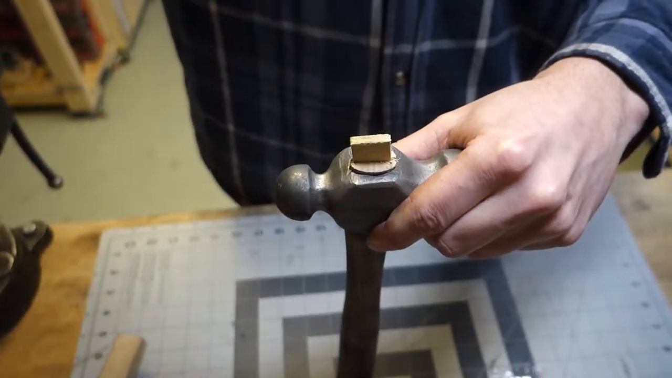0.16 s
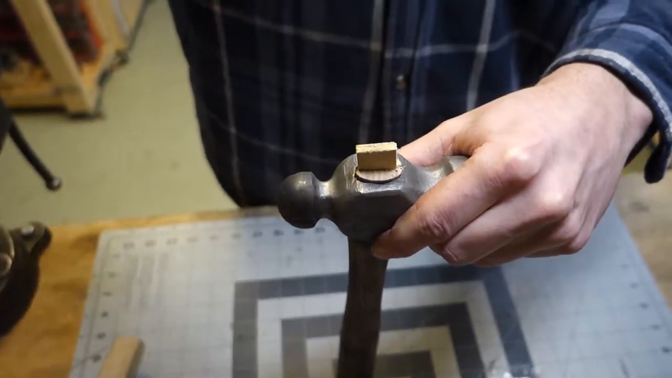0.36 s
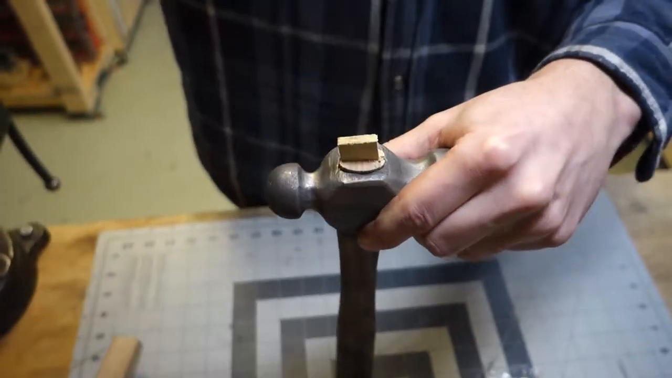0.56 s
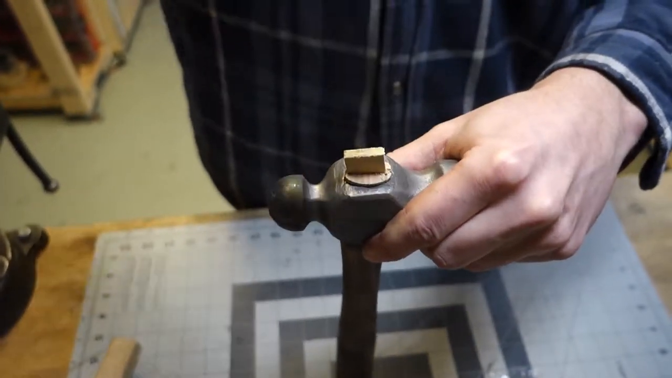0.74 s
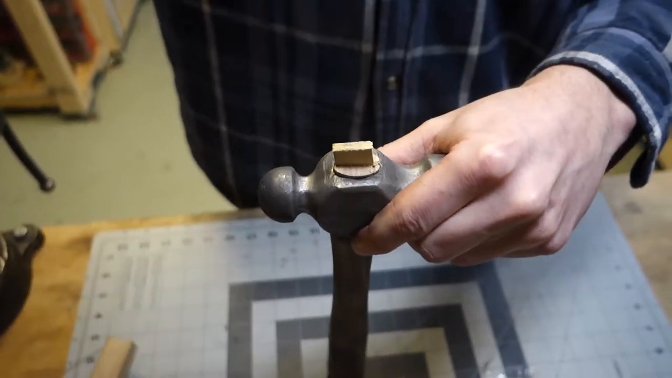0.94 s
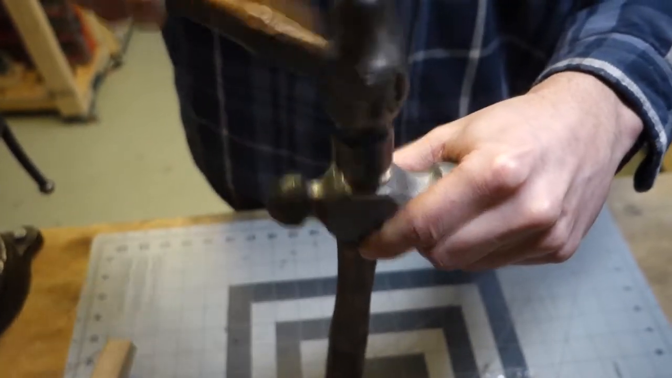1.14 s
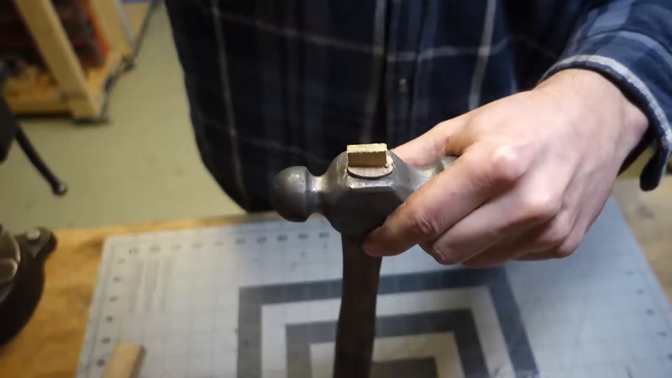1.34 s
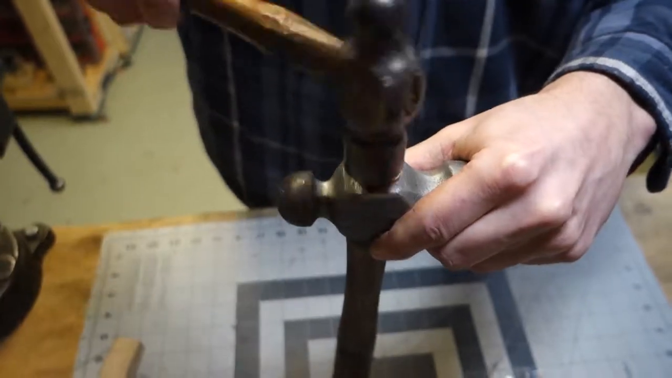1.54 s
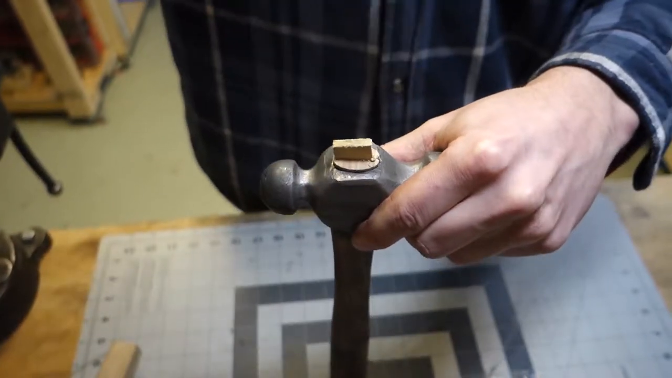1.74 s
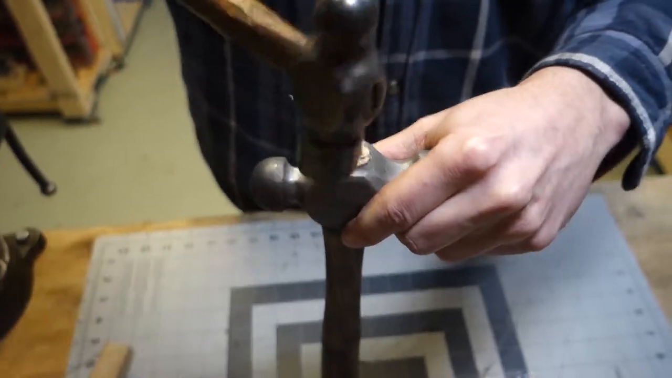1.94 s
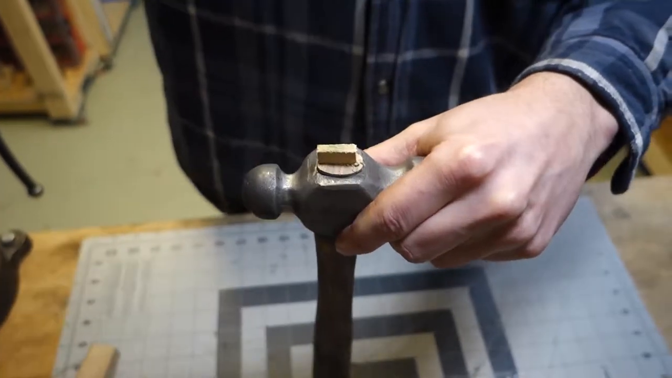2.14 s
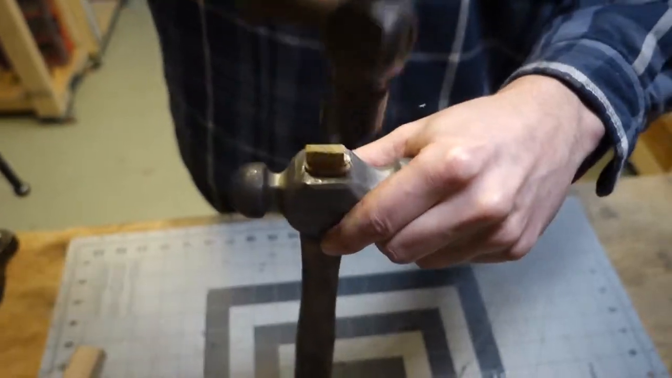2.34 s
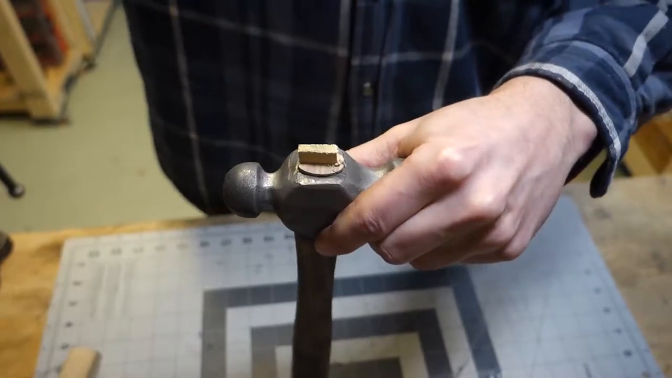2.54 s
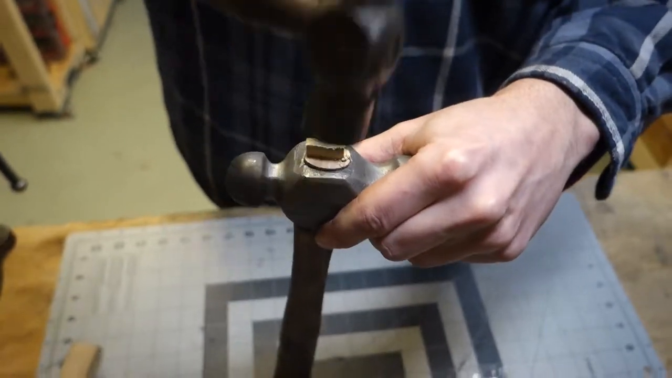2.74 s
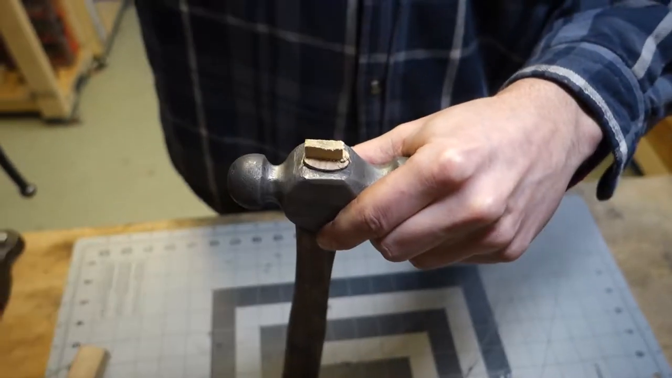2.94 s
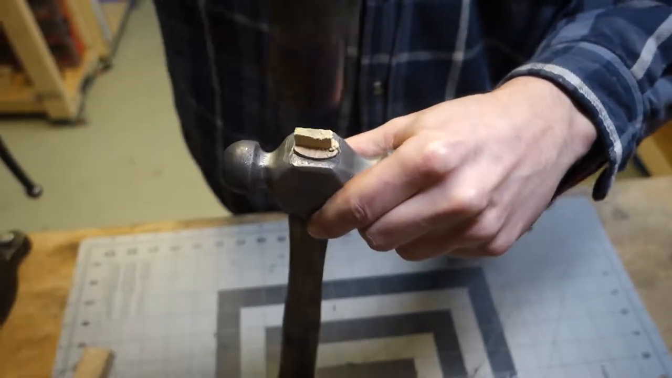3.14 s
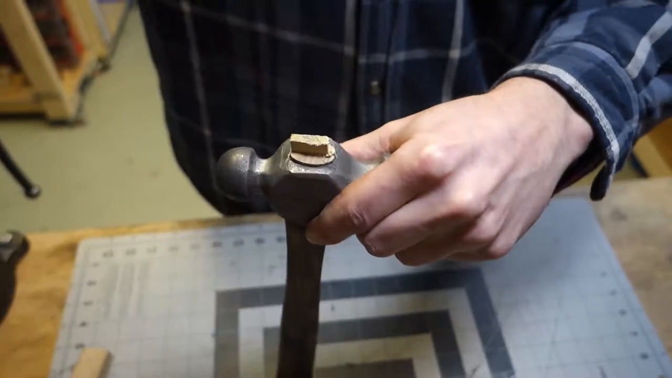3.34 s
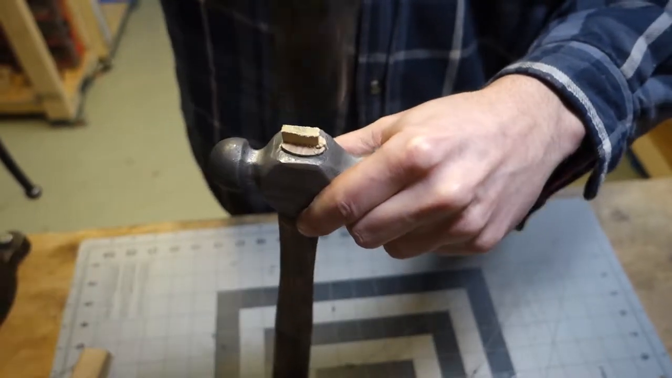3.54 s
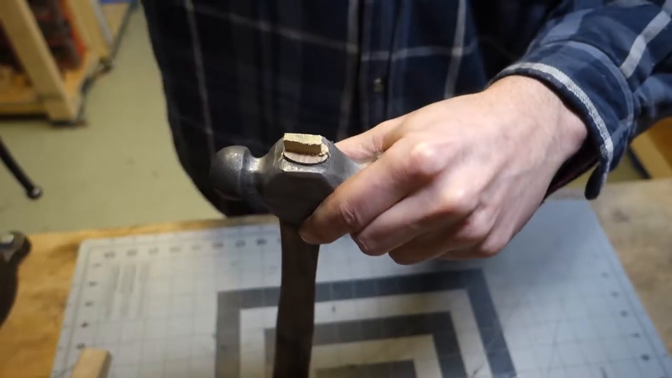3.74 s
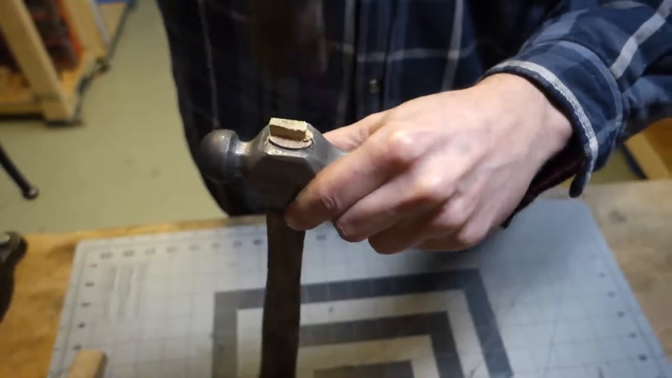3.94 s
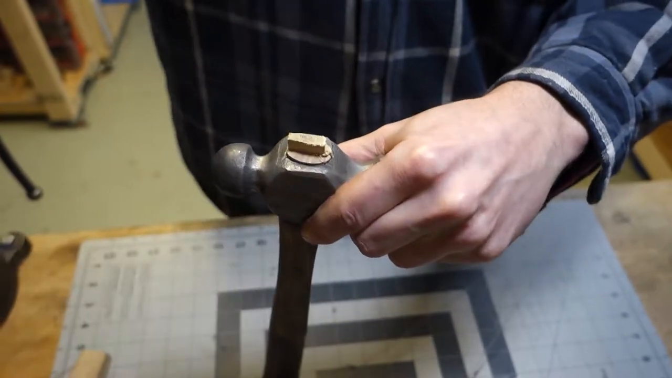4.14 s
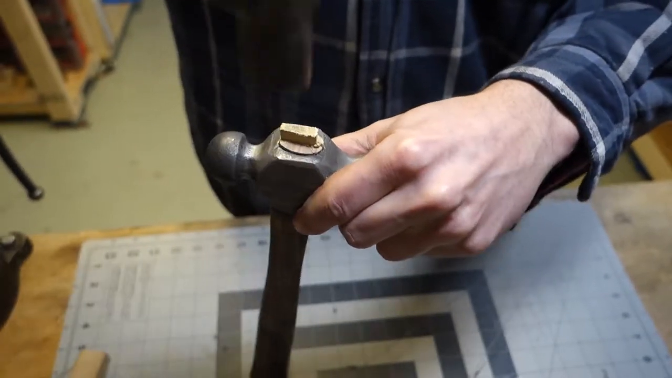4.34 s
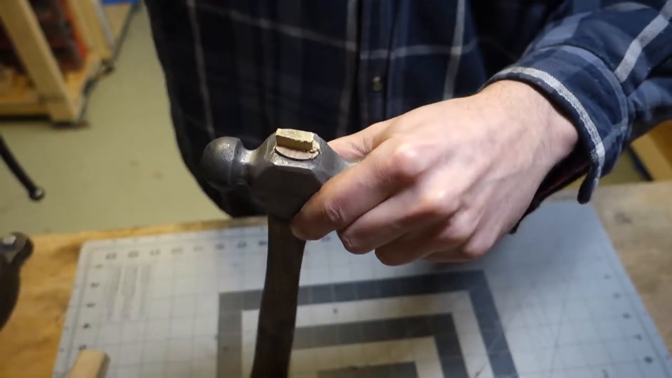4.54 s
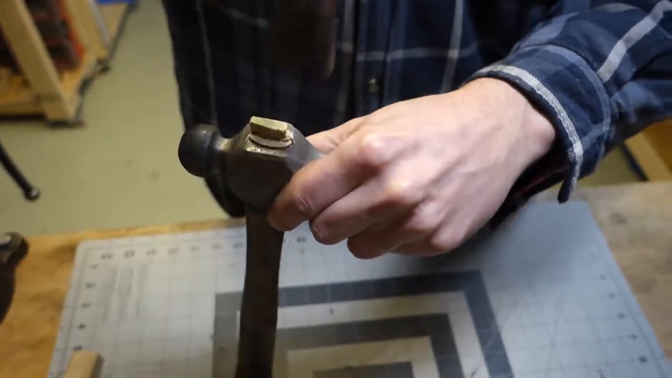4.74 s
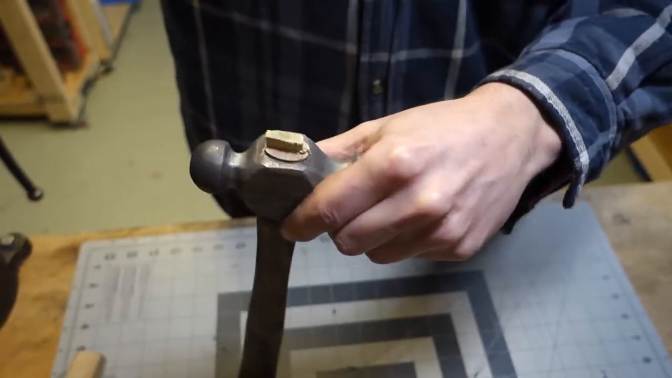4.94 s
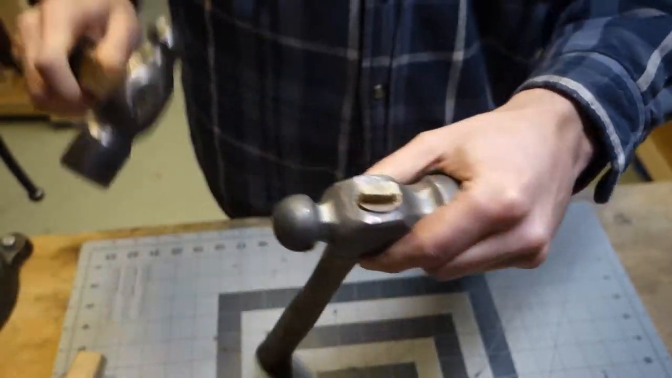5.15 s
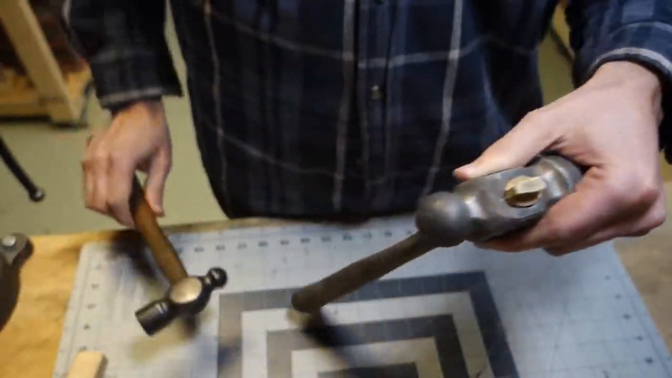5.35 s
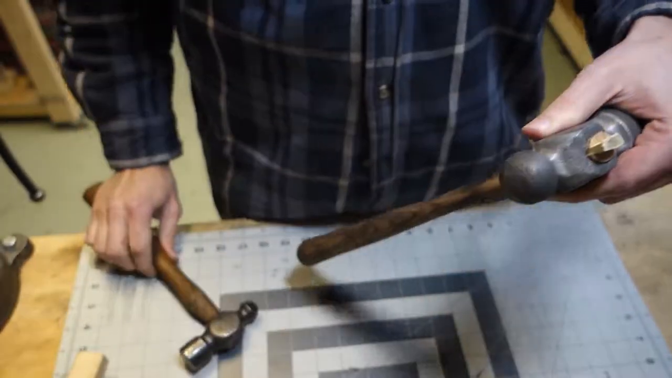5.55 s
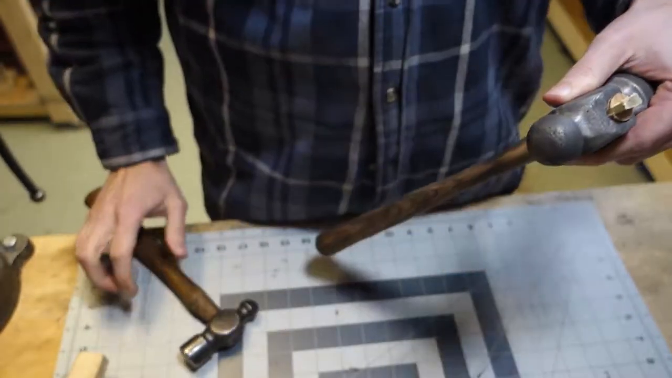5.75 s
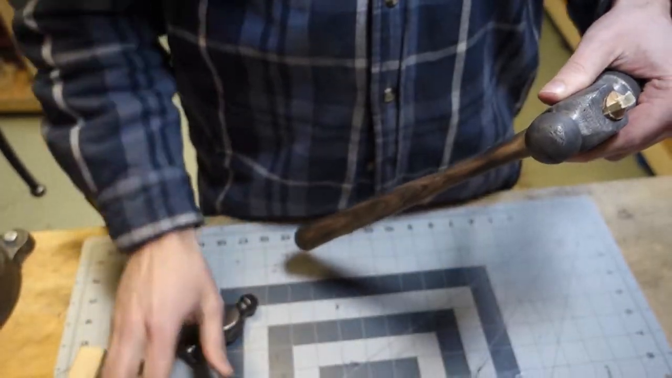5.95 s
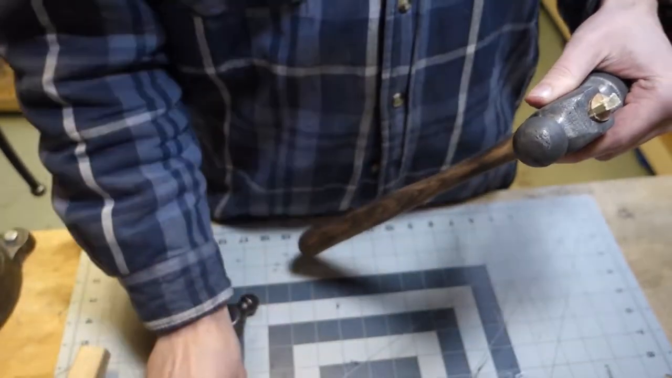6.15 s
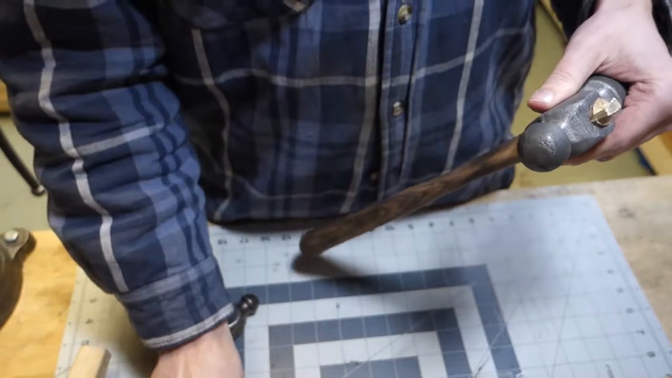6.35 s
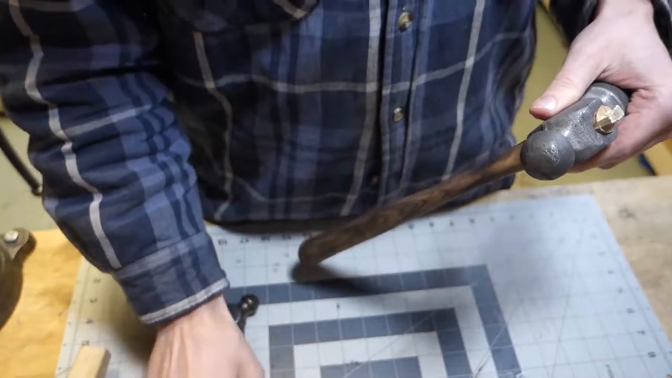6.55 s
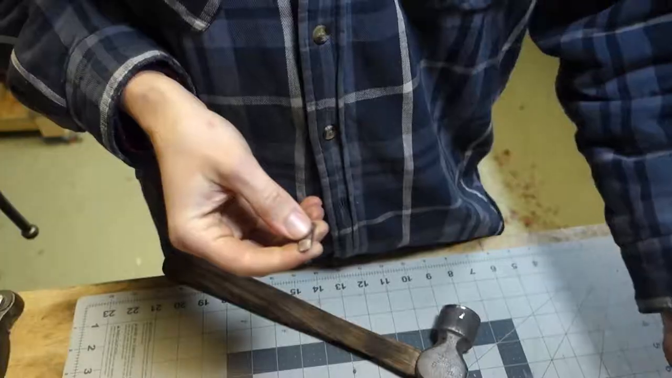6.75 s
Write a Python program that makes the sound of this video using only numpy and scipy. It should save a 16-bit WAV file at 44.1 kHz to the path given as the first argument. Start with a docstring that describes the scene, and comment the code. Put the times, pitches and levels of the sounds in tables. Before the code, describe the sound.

A hammer knocks a wooden wedge in steady loud woody thuds, a loose tool faintly rattling, before a mat thump, cloth rustle and soft hiss.

```python
"""A small hammer drives a wooden wedge into a handle standing on a workbench: twelve even blows, after the
rumble of one before the start. Each sums a crack (decaying noise), bench modes, steel modes and a room tail.
During the later blows a loose tool rattles on the bench. Then the hammer is laid on a mat (damped modes),
a sleeve drags over it (modulated noise), a bit of steel is picked up (wavering modes) and a soft hiss sinks away.
Faint noise lies beneath throughout; a limiter squashes the peaks and lets the room swell after them."""
import sys
import numpy as np
from scipy import signal
from scipy.fft import rfft, irfft
from scipy.io import wavfile
from scipy.ndimage import minimum_filter1d

SR = 44100
rng = np.random.default_rng(int(sys.argv[2]) if len(sys.argv) > 2 else 0)


def dump(signal):
    """Clip the signal to [-1, 1] and save it as 16-bit WAV at the path in sys.argv[1]."""
    limited = np.clip(np.atleast_2d(signal).T, -1, 1)
    pcm = np.round(limited * 32767).astype(np.int16)
    wavfile.write(sys.argv[1], SR, pcm)


N = 299435

# All levels in the tables are relative; the functions weight them further.
# Blows on the wedge: t/s, force level/dB, crack level/dB, steel ring level/dB
WEDGE_BLOWS = [(-.45, -5, 0, 0), (0.448, 0, -11.5, 6), (0.8304, 0.5, -8.5, -2), (1.205, -0.5, -7.5, 0.5),
               (1.5739, -1, -9.5, 3.5), (1.958, -1, -6, 1), (2.346, -1, -1, 7), (2.7424, -1.5, -4.5, 4.5),
               (3.1293, -3, -4.5, 9), (3.5341, -1.5, -0.5, 4.5), (3.9152, -0.5, 0, -7.5),
               (4.32, -0.5, -4.5, -1.5), (4.711, -2, -3, 2.5)]
# Resonances of the bench top: f/Hz, level/dB, decay time T60/s
BENCH_MODES = [(60.8, -14.5, 0.34), (94.8, -23, 0.45), (137.4, 1.5, 0.27), (148, -11.5, 0.47),
               (166.8, -0.5, 0.074), (207.8, -7.5, 0.17), (217, -3, 0.27), (247.4, -4, 0.25),
               (273.2, -3.5, 0.23), (308.8, -1.5, 0.2), (330, 0.5, 0.22), (359.7, -11.5, 0.33),
               (402, -23.5, .38), (397.4, -4, 0.23), (436.7, -23, 0.42), (488, -16.5, .34),
               (512, -21.5, 0.1), (581, -17, 0.29), (667, -22, 0.27), (766.6, -19, 0.42)]
# Resonances of the steel hammer head: f/Hz, level/dB, decay time T60/s
HEAD_MODES = [(4002, -54.5, 0.17), (4200, -43, 0.27), (6896, -37, 0.21), (7900, -47.5, 0.2),
              (8620, -50, 0.092), (9740, -41, 0.13), (9940, -44, 0.14), (11570, -49, 0.19),
              (11700, -56, .22), (12678, -45.5, .24), (13447, -47.5, 0.15), (14270, -48.5, .18),
              (15200, -41, .15)]
# Wedge biting into the handle, as noise: f/Hz, starting level/dB, decay time T60/s
CRACK_SPECTRUM = [(197.2, -11.5, 0.064), (700, -10.5, 0.18), (1700, -9, 0.12), (3170, -23, 0.059),
                  (5100, -31.5, 0.095), (8000, -29, 0.029), (11000, -40, .03), (16000, -32, .025)]
# Things shaking on the bench, as noise: f/Hz, starting level/dB, decay time T60/s
CHATTER_SPECTRUM = [(103.2, -18.5, 0.2), (674, -1.5, 0.35), (2360, -4, 0.3), (3280, -13.5, 0.34),
                    (5780, -25.5, 0.17), (15900, -38.5, 0.29)]
# Reverberation of the workshop: f/Hz, level/dB, decay time T60/s
WORKSHOP_REVERB = [(30, -14.5, 0.18), (67, 0.5, 0.52), (143.1, 26.5, 0.13), (360, 17.5, 0.31),
                   (476, 14, 0.32), (1013, 0.5, 0.34), (1625, 1.5, 0.35), (2556, -7, 0.32),
                   (3340, -17, 0.3), (5194, -25.5, 0.28), (9850, -34, 0.23), (16000, -27.5, 0.22)]
# Slower, mostly deep tail of each blow: f/Hz, level/dB, decay time T60/s
RUMBLE_REVERB = [(30, -26, 0.73), (60, -10.5, 1), (127.4, -13.5, 1.88), (218, -10, 1.25),
                 (385.7, -14, 0.87), (693, -23.5, 0.85), (1557, -51, 0.54), (5030, -65, 0.21)]
# Loose tool scraping, then landing on the bench: t/s, time in the air/s, ring level/dB
TOOL_RATTLES = [(3.6, 0.022, -45), (4.001, 0.03, -44.5), (4.393, 0.057, -43)]
# Resonances of the loose tool: f/Hz, level/dB, decay time T60/s
TOOL_MODES = [(3862, 4.5, 0.19), (3800, 3.5, 0.12)]
# Hammer and hand meeting the mat: t/s, thump level/dB, clack level/dB, time to the next touch/s
MAT_CONTACTS = [(5.584, -17, -13.5, 0.006), (5.719, -14.5, -25, 0.0069), (5.742, -6.5, -25.5, 0.013),
                (6.108, -45, -56, 0.023), (6.134, -47.5, -59, 0.023), (6.199, -42.5, -69, .016),
                (6.339, -52.5, -74, 0.012)]
# Resonances of the mat under a thump: f/Hz, level/dB, decay time T60/s
MAT_MODES = [(126, -7, 0.091), (173, 2.5, 0.044), (239.6, -0.5, 0.082), (388, 2.5, 0.039),
             (473, -9.5, 0.065), (676, -10, 0.034)]
# Woody clack on the mat, as noise: f/Hz, level/dB, decay time T60/s
CLACK_SPECTRUM = [(80, -18, .05), (400, -11, 0.029), (1380, -2.5, 0.033), (2580, -10, 0.015),
                  (3860, -23, 0.027), (9000, -33, 0.014), (15800, -47, 0.033)]
# Room answering the contacts with the mat: f/Hz, level/dB, decay time T60/s
CONTACT_REVERB = [(40.4, -13, 0.17), (130, -4.5, 0.88), (300, 6.5, 0.4), (677, 9, 0.24), (1440, -4, 0.21),
                  (2550, -18.5, 0.32), (4400, -38, 0.28), (15500, -53, 0.12)]
# Fingers picking up the bit of steel: t/s, ring level/dB, extra level of the high modes/dB, tick level/dB
STEEL_TOUCHES = [(6.396, -50, -20, -51), (6.439, -51.5, 3, -51), (6.514, -73.5, -0.5, -51),
                 (6.654, -80.5, 5.5, -48.5)]
# Resonances of the bit of steel: f/Hz, level/dB, decay time T60/s
BIT_MODES = [(2480, -11, 0.069), (2630, 1, 0.081), (3720, -9, 0.059), (3834, -7.5, 0.18),
             (4000, -14, 0.083), (6610, -8, 0.091), (8786, -10, 0.052)]
# Sleeve strokes over the mat: t/s, hold time/s, level/dB
SLEEVE_STROKES = [(5.85, 0.5, -17.5), (6.133, 0.041, 8.5), (6.358, 0.11, 0.5)]
# Spectrum of cloth on the mat: f/Hz, level/dB
CLOTH_SPECTRUM = [(30, -80), (200, -49), (600, -76.5), (1200, -63.5), (1600, -68), (2400, -58.5),
                  (3400, -73), (6000, -85), (15000, -93)]
# Spectrum of the soft hiss: f/Hz, level/dB
HISS_SPECTRUM = [(30, -47), (80, -36), (200, -55.5), (700, -55), (1350, -47.5), (2200, -63), (8000, -67.5),
                 (15000, -63)]
# Steady spectrum of the quiet workshop: f/Hz, level/dB
FLOOR_SPECTRUM = [(30, -72.5), (110, -55), (250, -65), (500, -74.5), (1000, -77), (4000, -82.5),
                  (16000, -104)]
# Stereo width of all noise, side against mid: f/Hz, level/dB
STEREO_WIDTH = [(60, -19.5), (250, -14.5), (600, -8), (2000, -8.5), (4500, 0), (15000, -1.5)]

CUTOFF_HZ = 16000
RING_SIZE = SR * 6 // 5  # samples in one decaying sound
TIME = np.arange(RING_SIZE) / SR
# once the wedge has seated, the blows boom less in the room
SEATED_AT_S, SEATING_TAKES_S = 3.48, 0.55
THUD_DB, BOOM_LOOSE_DB, BOOM_SEATED_DB = -2.5, 0, -3
# after each contact the thing rocks: the gaps widen and every touch is weaker
ROCK_GAP_RATIO, ROCK_THUMP_LOSS_DB, ROCK_CLACK_LOSS_DB = 1.8, 9, 4.5
# small steel things ring a little differently at every touch
TOUCH_SCATTER_DB = 1.5
# the bit touches a second time
RETOUCH_S, RETOUCH_LOSS_DB = 0.0071, 2
SCRAPE_DB, LANDING_TICK_DB = -34, -40.5
SLEEVE_ATTACK_S, SLEEVE_T60_S = 0.023, 0.21
HISS_START_S, HISS_DB, HISS_ATTACK_S, HISS_T60_S = 6.678, 10, 0.0029, 0.62


def hammering(change=0.32, handle_delay_s=0.0018, rebound_s=0.021, softness=0.18,
              crack_pan_db=0.1, steel_pan_db=-3.5):
    """Impact excitation: the wedge cracks, the handle carries the blow to the bench, the steel rings on rebound."""
    out = np.zeros((2, N))
    rooms = np.array([workshop_response() for _ in range(5)])
    for s, force_db, crack_db, ring_db in WEDGE_BLOWS:
        seated = np.clip(0.5 + (s - SEATED_AT_S) / SEATING_TAKES_S, 0, 1)
        boom_db = BOOM_LOOSE_DB + seated * (BOOM_SEATED_DB - BOOM_LOOSE_DB)
        room = varied_room(rooms, change)
        bench = bench_thud(crack_db, softness)
        crack = wedge_crack()
        head = steel(HEAD_MODES, scatter_db=0.5, waver_db=5.5, waver_hz=58.7) * build_up(0.01)

        crack_gain = from_db(force_db + crack_db) * from_db([[crack_pan_db], [-crack_pan_db]])
        head_gain = from_db(force_db + ring_db) * from_db([[steel_pan_db], [-steel_pan_db]])
        thud = from_db(force_db + THUD_DB) * bench
        boom = from_db(force_db + boom_db) * room
        add(out, s, crack_gain * crack)
        add(out, s + handle_delay_s, thud + boom)
        add(out, s + rebound_s, head_gain * head)
    return out


def wedge_crack():
    """Intermittent fracture: wood fibres give way in fits, and things on the bench chatter."""
    chatter = dense_ring(CHATTER_SPECTRUM) * build_up(0.039)
    return (dense_ring(CRACK_SPECTRUM) + chatter) * grain(RING_SIZE, depth_db=3.5, hz=372.5)


def bench_thud(crack_db, softness):
    """Modal response: a blow with little crack is soft and feeds the higher bench modes less."""
    modes = []
    for hz, db, t60 in BENCH_MODES:
        tilt_db = softness * min(crack_db, 0) * np.log2(hz / 140)
        modes.append((hz, db + tilt_db, t60))
    # the heavy top takes a few milliseconds to get moving
    return ring(modes, scatter_db=1.5, detune=0.0044) * build_up(0.0027)


def workshop_response():
    """Reverberation: a room tail and a slower rumble gather, then decay at rates set by frequency."""
    return dense_ring(WORKSHOP_REVERB) * build_up(0.02) + dense_ring(RUMBLE_REVERB) * build_up(0.02)


def varied_room(rooms, change):
    """Superposition: the room answers much alike each time; the handle shifts a little between blows."""
    shift = rng.standard_normal(len(rooms) - 1)
    mix = np.append(1, change * shift / np.linalg.norm(shift))
    return np.tensordot(mix / np.linalg.norm(mix), rooms, 1)


def rattling():
    """Repeated contact: a loose tool scrapes, hops and lands ringing on the bench."""
    out = np.zeros((2, N))
    for s, air_s, ring_db in TOOL_RATTLES:
        landing = s + air_s
        add(out, s, from_db(SCRAPE_DB) * tick(t60=0.13, low_hz=2510))
        add(out, landing, from_db(LANDING_TICK_DB) * tick(t60=0.13, low_hz=2510))
        tool = steel(TOOL_MODES, scatter_db=TOUCH_SCATTER_DB, waver_db=5.5, waver_hz=180)
        add(out, landing, from_db(ring_db) * tool * build_up(0.0074))
    return out


def laying_down(thump_room_db=-15.5, clack_room_db=-8.0):
    """Damped impact: dull thumps on the yielding mat with a woody clack on top; both reach the room."""
    out = np.zeros((2, N))
    for s, thump_db, clack_db in rocking(count=4):
        mat = ring(MAT_MODES, scatter_db=0.0, detune=0.058) * build_up(0.0054)
        thump = from_db(thump_db + 0.5) * mat
        clack = from_db(clack_db) * dense_ring(CLACK_SPECTRUM) * build_up(0.0006)
        # the two sends add as powers
        send = np.hypot(from_db(thump_db + thump_room_db), from_db(clack_db + clack_room_db))
        room = send * dense_ring(CONTACT_REVERB) * build_up(0.0015)
        add(out, s, thump + clack + room)
    return out


def rocking(count):
    """Energy loss in rocking: each contact becomes touches of t/s, thump level/dB, clack level/dB."""
    for s, thump_db, clack_db, gap in MAT_CONTACTS:
        for k in range(count):
            yield s, thump_db - k * ROCK_THUMP_LOSS_DB, clack_db - k * ROCK_CLACK_LOSS_DB
            s += gap * ROCK_GAP_RATIO ** k


def sleeve():
    """Friction noise: cloth drags over the mat in a few grainy strokes."""
    strokes = 0
    for s, hold_s, db in SLEEVE_STROKES:
        strokes = strokes + from_db(db) * swell(s, SLEEVE_ATTACK_S, hold_s, SLEEVE_T60_S)
    return strokes * noise(CLOTH_SPECTRUM) * grain(N, depth_db=5.5, hz=160)


def picking_up(split_hz=5000, top_hz=9000):
    """Damped modes: the bit of steel rings briefly, its high modes weighted anew at each touch."""
    out = np.zeros((2, N))
    for s, ring_db, high_db, tick_db in STEEL_TOUCHES:
        modes = [(hz, db + ring_db + high_db * (hz > split_hz), t60) for hz, db, t60 in BIT_MODES]
        for k in range(2):
            bit = steel(modes, scatter_db=TOUCH_SCATTER_DB, waver_db=6.0, waver_hz=260)
            scratch = from_db(tick_db - 5.5) * tick(t60=0.061, low_hz=1520)
            add(out, s + k * RETOUCH_S, from_db(-k * RETOUCH_LOSS_DB) * (bit + scratch))
    return signal.sosfilt(signal.butter(2, top_hz, fs=SR, output="sos"), out)


def hiss():
    """Shaped noise: a soft hiss comes up at the end and decays exponentially."""
    envelope = swell(HISS_START_S, HISS_ATTACK_S, 0, HISS_T60_S)
    return from_db(HISS_DB) * envelope * noise(HISS_SPECTRUM)


def background():
    """Stationary noise: the quiet workshop has a steady coloured spectrum."""
    return noise(FLOOR_SPECTRUM)


def from_db(db):
    """Logarithmic level: decibels to amplitude gain."""
    return 10 ** (np.asarray(db) / 20)


def at_hz(rows, hz, axis=1):
    """Logarithmic frequency: one table column interpolated against log f."""
    rows = np.array(rows, float)
    return np.interp(np.log(hz + 1), np.log(rows[:, 0]), rows[:, axis])


def add(out, s, sound):
    """Superposition: mix a sound in from time s, clipped to the scene's span."""
    start = round(s * SR)
    first, last = max(start, 0), min(start + sound.shape[-1], N)
    out[:, first:last] += sound[..., first - start:last - start]


def fade(t60):
    """Exponential free decay: 60 dB down after t60 seconds."""
    return np.exp(-np.log(1000) * TIME / max(t60, 1e-3))


def build_up(seconds):
    """Exponential onset: motion or reflections take a moment to gather."""
    return 1 - np.exp(-TIME / max(seconds, 1e-4))


def swell(s, attack_s, hold_s, t60):
    """Attack and decay: a gain that rises at time s, holds and dies away."""
    age = np.maximum(np.arange(N) / SR - s, 0)
    rise = 1 - np.exp(-age / attack_s)
    return rise * np.exp(-np.log(1000) * np.maximum(age - hold_s, 0) / t60)


def grain(size, depth_db, hz):
    """Random amplitude modulation: an uneven gain that changes about hz times a second."""
    knots = rng.standard_normal(size // 20)
    return from_db(depth_db * np.interp(np.arange(size) * hz / SR, np.arange(len(knots)), knots))


def stereo_spectrum(rows, size):
    """Mid and side noise: coloured for two ears, alike in the bass and wide in the treble."""
    hz = np.arange(size // 2 + 1) * SR / size
    mid, side = rfft(rng.standard_normal((2, size)))
    side = side * from_db(at_hz(STEREO_WIDTH, hz))
    return hz, np.array([mid + side, mid - side]) * from_db(at_hz(rows, hz))


def noise(rows):
    """Spectral shaping: steady coloured noise."""
    return irfft(stereo_spectrum(rows, N)[1], N)


def dense_ring(rows):
    """High modal overlap: noise in octave bands, each dying at its own rate."""
    hz, spectrum = stereo_spectrum(rows, RING_SIZE)
    centres = np.geomspace(32, 16384, 10)
    out = 0
    for centre, share in zip(centres, np.eye(len(centres))):
        band = np.interp(np.log(hz + 1), np.log(centres), share)
        out = out + irfft(spectrum * band, RING_SIZE) * fade(at_hz(rows, centre, axis=2))
    return out


def ring(modes, scatter_db, detune):
    """Modal superposition: struck modes of alternating sign, weighted and tuned anew at each touch."""
    out = np.zeros(RING_SIZE)
    for k, (hz, db, t60) in enumerate(modes):
        weight, shift = rng.standard_normal(2)
        gain = -(-1) ** k * from_db(db + scatter_db * weight)
        out += gain * fade(t60) * np.sin(2 * np.pi * hz * (1 + detune * shift) * TIME)
    return out


def steel(modes, scatter_db, waver_db, waver_hz):
    """Directional radiation: steel radiates in lobes and moves, so each mode wavers separately per side."""
    out = np.zeros((2, RING_SIZE))
    for hz, db, t60 in modes:
        envelope = from_db(db + scatter_db * rng.standard_normal()) * fade(t60)
        phase = 2 * np.pi * (hz * TIME + rng.random())
        for side in out:
            waver = grain(RING_SIZE, waver_db, waver_hz)
            side += envelope * waver * np.sin(phase + rng.standard_normal())
    return out


def tick(t60, low_hz):
    """High-passed transient noise: a short bright scratch of metal."""
    bright = signal.butter(2, low_hz, "high", fs=SR, output="sos")
    return signal.sosfilt(bright, rng.standard_normal((2, RING_SIZE)) * fade(t60))


def scene():
    """Linear superposition of hammering, handling, hiss and the quiet workshop."""
    handling = laying_down() + sleeve() + picking_up()
    return hammering() + rattling() + handling + hiss() + background()


def limiter(x, threshold_db=-4.0, release_db_per_s=170, attack_s=0.00047, ahead_s=0.003, overshoot=0.66):
    """Gain reduction: ducks just before a peak, climbs back after it, and ducks too far after a quiet spell."""
    level_db = 20 * np.log10(np.abs(x).max(axis=0) + 1e-9)
    over = np.maximum(level_db - threshold_db, 0)
    t = np.arange(N) / SR
    # peak hold that falls at a constant rate
    held = np.maximum.accumulate(over + release_db_per_s * t) - release_db_per_s * t
    # largest hold from 0.75 to 0.25 s ago
    largest = -minimum_filter1d(-held, size=SR // 2)
    recent = np.interp(t - 0.5, t, largest)
    target_db = held + overshoot * np.maximum(held - recent, 0)
    r = np.exp(-1 / (attack_s * SR))
    duck_db = signal.lfilter([1 - r], [1, -r], target_db)
    return x * from_db(-np.interp(t + ahead_s, t, duck_db))


def record(dry, low_cut_hz=48):
    """Band limiting: the deepest bass is cut, the limiter acts, then the top is cut."""
    low_cut = signal.butter(3, low_cut_hz, "high", fs=SR, output="sos")
    limited = limiter(signal.sosfilt(low_cut, dry))
    top_cut = signal.ellip(10, 0.1, 70, CUTOFF_HZ, fs=SR, output="sos")
    return signal.sosfilt(top_cut, limited)


dry = scene()
out = record(dry)
dump(out)
```